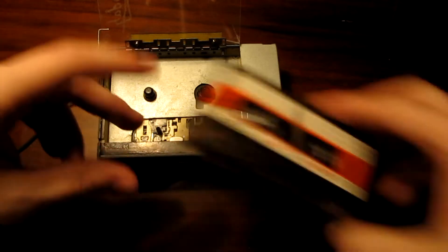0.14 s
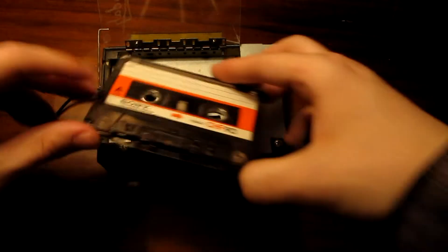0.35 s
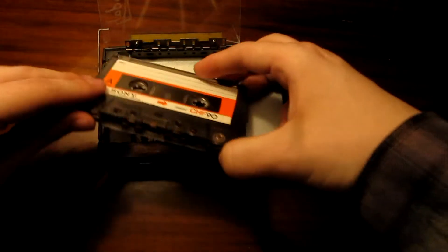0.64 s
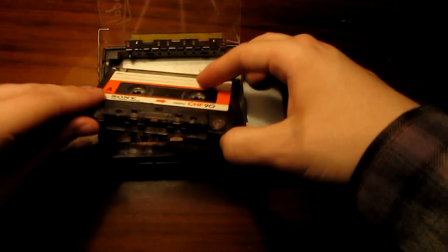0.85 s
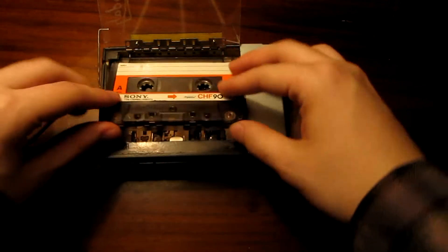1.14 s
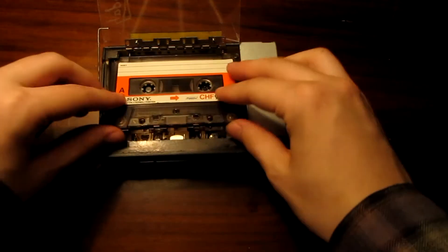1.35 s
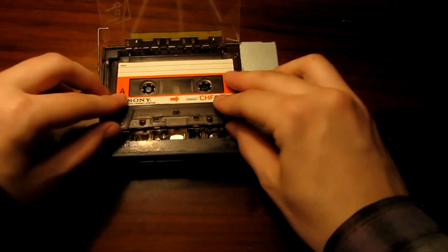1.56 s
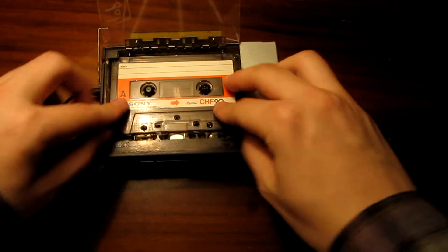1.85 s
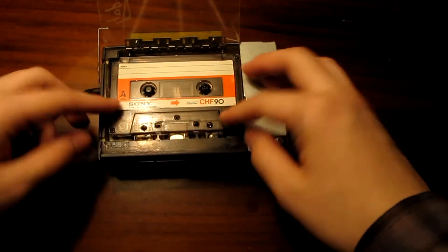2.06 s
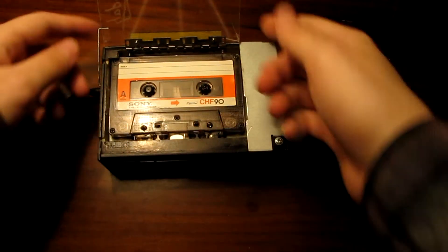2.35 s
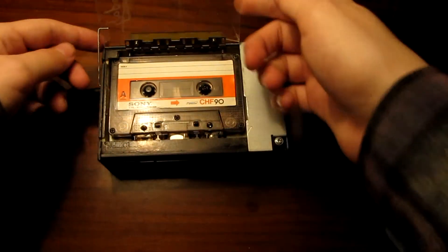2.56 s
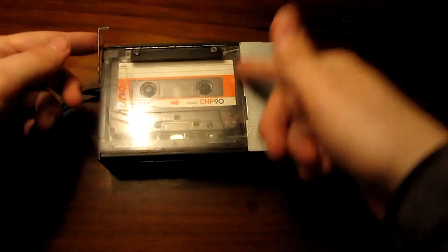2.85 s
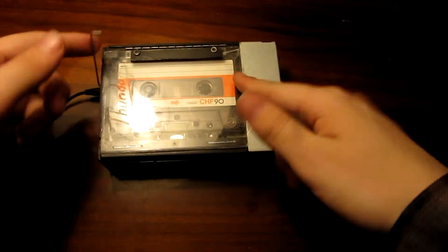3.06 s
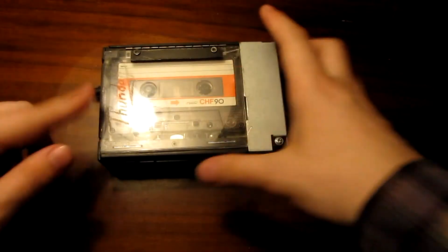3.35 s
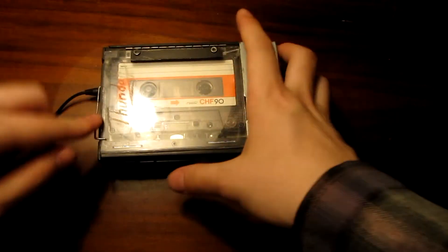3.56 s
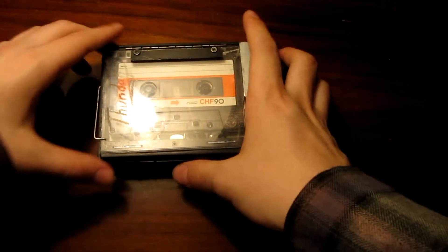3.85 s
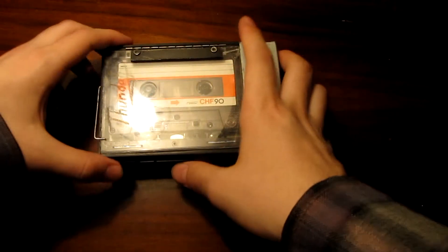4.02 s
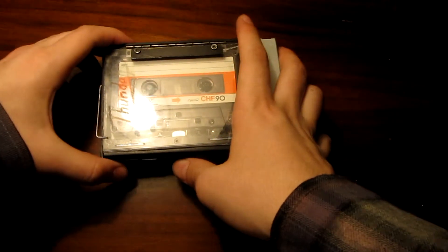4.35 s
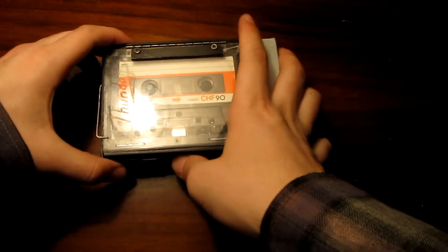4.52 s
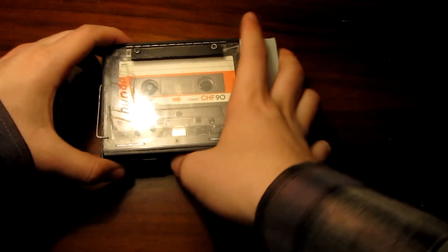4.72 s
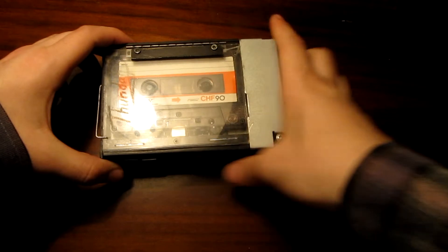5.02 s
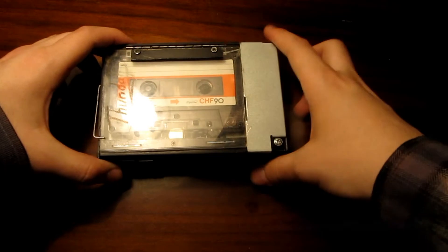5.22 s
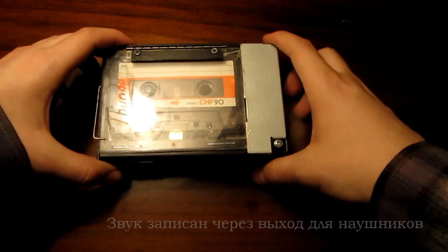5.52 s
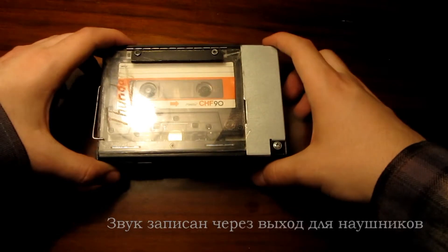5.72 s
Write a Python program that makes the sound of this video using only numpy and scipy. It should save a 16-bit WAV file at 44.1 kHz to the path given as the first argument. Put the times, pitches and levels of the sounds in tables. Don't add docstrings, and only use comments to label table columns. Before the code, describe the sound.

Dry, bright plastic handling sounds: an opening clack, a loose run of rattling taps, a hard double click, a pause with faint finger rubbing, a strong lid snap and a few light button clicks. Soft desk thuds and quiet room noise lie beneath. At the end the sound switches to the player's own output, a dull thump and steady faint hum with hiss.

```python
import sys
import numpy as np
from scipy import signal
from scipy.fft import rfft, irfft
from scipy.io import wavfile
from scipy.ndimage import uniform_filter1d

SR = 44100
rng = np.random.default_rng(int(sys.argv[2]) if len(sys.argv) > 2 else 0)


def boost_factor(decibels):
    exponent = np.asarray(decibels, float) / 20
    return 10 ** exponent


def to_wav(s):
    ch = np.atleast_2d(s).T
    pcm = np.round(np.clip(ch, -1, 1) * 32767)
    wavfile.write(sys.argv[1], SR, pcm.astype(np.int16))


N = 259308
LID_SHUT_S, FADE_S, SWITCH_S = 2.6, 4.345, 4.3715

# start in seconds, peak level in dB,
# body relative to it in dB, brightness relative to it in dB, chatter t60 in seconds.
LID_OPENS = [
    (.0014, -29.5, -14, 11, 0.056),
    (.0054, -12.5, -16, -9, .084),
    (.012, -19, -8.5, -0.5, 0.046),
    (.0171, -18.5, -25, -22, 0.045),
    (0.0232, -25, -11, -7, 0.034),
]
TAPE_LAID = [(0.408, -47, -13, -4, 0.054), (.413, -42, -26, -5, 0.037), (0.4557, -49.5, -4, -5, 0.039),
             (.602, -19.5, -12.5, -17, 0.036), (.6234, -31, -5, -21, 0.064), (0.6512, -25, -18, -18, 0.032),
             (0.6732, -26.5, -12.5, -21, 0.025), (.6856, -34, 0, -15, 0.042),
             (0.6968, -21, -30, -17.5, 0.014), (.734, -19.5, -21, -21.5, 0.014),
             (0.7793, -20, -10.5, -15, 0.042), (0.8953, -21.5, -5, -15, 0.041),
             (.9193, -12, -9.5, -14, 0.035), (1.0324, -27.5, -8, -20.5, 0.011), (1.061, -38, 2, -14, 0.031),
             (1.0644, -31, -3, -25, 0.051), (1.093, -37.5, -3, -20, 0.031), (1.1086, -29, -2, -6.5, 0.026),
             (1.2288, -42, -6, -5, 0.033), (1.298, -26.5, -4.5, -16, .035)]
TAPE_SEATS = [
    (1.4285, -52, 14.5, 8, .11),
    (1.4626, -9, -13, -10, 0.013),
    (1.4669, -9.5, -10.5, 0, 0.011),
    (1.4701, -14, -17, -8, 0.018),
    (1.4837, -32, -14, -5, .032),
    (1.678, -55, -32, -4.5, 0.028),
    (1.8316, -56, -1.5, -2, 0.037),
    (1.845, -56, -9.5, 0.5, .033),
]
LID_SHUTS = [
    (2.6602, -6, -8, 1.5, .013),
    (2.689, -21.5, -6, 0, 0.022),
    (2.711, -32.5, -18, 1, 0.036),
    (2.8075, -36, -10, -1.5, 0.028),
    (2.9247, -65.5, -6.5, -8, .035),
]
KEYS = [(3.2158, -28, -17.5, 1.5, 0.033), (3.2173, -26, -10, -4, 0.035), (3.3994, -62.5, -9.5, -7.5, .035),
        (3.5443, -24.5, -2, -4, 0.039), (3.5545, -28, -3, -5, .03), (3.5634, -33.5, -3, -12, 0.19),
        (3.695, -35.5, -8.5, -20.5, .015), (3.794, -38, -5, -24, 0.025), (4.1829, -64, 5, -1.5, 0.038),
        (4.21, -45, 2.5, -7, .035), (4.2203, -31, -15, -7, 0.012), (4.2238, -32, -15, -15, .012),
        (4.2419, -39.5, -16, -15, .037), (4.2925, -62, -6, -3, .03), (4.3272, -49, -2, 1, 0.065),
        (4.3368, -38, -10, -15, 0.016)]
# seconds, dB, dB, dB, seconds.
FURTHER_CONTACTS = [(2.6582, -34, -10, 0, .02), (1.4503, -40, -5, -15, .03), (1.4548, -30, -8, -12, .03),
                    (1.4885, -36, -15, 0, .02), (3.5475, -29, 0, -6, .02), (3.5505, -29, 0, -8, .02),
                    (0.7055, -36, -10, -15, .012), (0.7425, -34, -10, -18, .015), (0.7545, -35, -10, -15, .015),
                    (0.7655, -38, -10, -15, .015), (0.662, -40, -8, -15, .015), (4.2285, -44, -8, -12, .015),
                    (4.3335, -44, -8, -3, .02), (2.663, -22, -8, 0, .03), (1.4612, -26, -15, 0, .02),
                    (1.0225, -42, -5, -15, .03), (1.0375, -36, -6, -18, .015), (1.058, -40, -3, -15, .02),
                    (1.2945, -42, -5, -15, .03), (1.215, -55, -15, -5, .02), (3.226, -40, -8, 1, .15),
                    (.885, -44, -5, -15, .03)]
# (Hz, level in dB).
STRUCK_PARTS = [
    (0, [(800, 0), (1400, 0), (2400, 0), (4000, 0), (6600, 0), (9000, 0), (13000, -3)]),
    (.3, [(800, 3), (1100, -4), (1700, 1), (2400, 0), (3300, 0), (4500, -2), (7500, 2), (12000, -3)]),
    (1.4, [(800, 2), (1300, -8), (1800, 3), (2400, 2), (2900, -3), (4300, 6), (5600, -4), (7500, 1), (13000, -2)]),
    (2.6, [(800, 0), (1300, -4), (1800, 2), (2900, 0), (4000, 1), (6600, 2), (7600, -5), (11500, 3)]),
    (3.1, [(800, 0), (1500, -6), (2800, 0), (4000, -3), (5000, 2), (7500, 2), (10000, -2), (12000, 5)]),
    (3.5, [(800, 0), (1400, -1), (2000, -2), (2900, 2), (4000, 1), (6600, 0), (12000, 0)]),
    (3.65, [(800, 0), (1400, 0), (2300, -6), (3300, 0), (4500, -4), (8000, 0)]),
    (4.1, [(800, 2), (1400, -5), (2400, 2), (3300, 2), (5000, 0), (8000, 0), (13000, -4)]),
    (4.3, [(800, -5), (1400, 3), (2400, -3), (3300, 0), (5000, 0), (8000, 0), (13000, -4)]),
]
# frequency in Hz, level in dB, t60 in seconds.
BODY_MODES = [(775, -1.5, .01), (1080, -3.5, .012), (1400, -0.5, 0.0087)]
SHELL_MODES = [(1733.6, 0, 0.0035), (2380, 0.018, 0.0051), (2870, 1, 0.0068), (3300, 0.78, 0.0034)]
UPPER_MODES = [(3930, 2, 0.0045), (4700, 0.39, .004), (5000, -1.8, 0.0067), (5597, -2, 0.0019)]
TREBLE_MODES = [(6600, 2.5, 0.0024), (7480, 2.5, 0.0036), (8800, 6, 0.0016), (10160, 3.5, 0.0023),
                (11540, -0.5, 0.0024), (13660, -6.5, 0.0038), (15200, -3.5, .0015)]
# frequency in Hz, level in dB, t60 in seconds.
BAY_RING = [(613, -43, .08), (1370, -48, 0.048), (1800, -46, 0.04), (2130, -49, .045), (2860, -47.5, .06),
            (4330, -53, 0.05), (7560, -45, 0.032)]
LID_RING = [(481, -41, 0.063), (1111.3, -48.5, 0.14), (1340, -47.5, 0.081), (1480, -49.5, 0.066),
            (2430, -53, 0.14), (2900, -50, .07), (3650, -49.5, 0.071), (4900, -49, 0.066)]
# start in seconds, frequency in Hz, level in dB, t60 in seconds.
PINGS = [(2.6604, 2280, -15, .03), (2.6603, 1110, -21, .06), (2.6603, 1350, -29, .06),
         (2.668, 9250, -35, .05), (2.69, 9200, -30, .02), (2.69, 2800, -40, .15), (3.217, 490, -48, .12),
         (3.217, 1100, -50, .1), (3.218, 2860, -36, .06), (4.2205, 3000, -36, .015),
         (4.224, 2600, -41, .02), (4.3365, 1500, -42, .02), (4.337, 3250, -44, .02),
         (1.299, 2900, -36, .025), (1.299, 1800, -38, .03), (.897, 1800, -34, .02),
         (1.037, 1800, -36, .015), (3.56, 750, -44, .12), (1.489, 7500, -34, .012),
         (2.6604, 3950, -15, .015), (2.6606, 6240, -17, .012), (2.6606, 9210, -13, .014),
         (2.6606, 11100, -19, .012), (2.692, 2370, -45, .2), (2.692, 1500, -48, .25),
         (2.692, 1110, -48, .2), (2.808, 1110, -48, .06), (2.808, 4850, -48, .03), (1.467, 4330, -10, .014),
         (1.467, 1790, -17, .025), (1.4675, 7540, -19, .025), (1.4675, 6600, -22, .02),
         (3.2165, 12000, -34, .015), (3.2162, 7400, -38, .03), (3.2175, 5090, -38, .025),
         (3.546, 1420, -39, .05), (3.5625, 1300, -42, .05), (3.5735, 3950, -46, .02), (3.552, 280, -35, .1),
         (4.327, 1250, -50, .04), (4.21, 950, -52, .03), (4.219, 300, -52, .08), (.919, 2130, -26, .03),
         (.92, 7900, -34, .012), (.78, 1850, -32, .03), (.652, 4100, -36, .012), (.825, 1800, -50, .08)]
# start in seconds, peak level in dB, share of the hollow ring in dB.
KNOCKS = [(0.009, -41.5, -15.5), (0.6, -35.5, -18), (0.648, -49.5, 3), (0.699, -43.5, 3), (0.728, -52, -6),
          (0.78, -37, -15.5), (0.901, -43.5, -1), (0.918, -36.5, -4.5), (1.0225, -35, -3),
          (1.058, -40.5, -6), (1.108, -44.5, -4), (1.297, -41.5, -11.5), (1.43, -41.5, -1.5),
          (1.466, -30, -4.5), (1.834, -51, -5), (2.66, -27.5, -13), (2.689, -59, -7), (3.219, -49, -6.5),
          (3.55, -33, -5), (3.566, -44.5, -1.5), (4.218, -45, -2), (4.238, -52.5, -2.5), (4.335, -59, -3)]
# frequency in Hz, level in dB, t60 in seconds.
DESK_MODES = [(55, -14.5, 0.061), (133, -7, 0.043), (208.4, -6, .06), (231, -4.5, 0.074),
              (316.7, 0.5, 0.029), (413, -4, 0.026), (500, -7, 0.022)]
# centre in seconds, length in seconds, frequency in Hz,
# half width as a share of the frequency, level in dB.
SCUFFS = [(0.516, .04, 4000, 0.16, -62), (0.75, 0.02, 2400, 0.35, -52), (0.839, 0.021, 2390, 0.53, -51.5),
          (0.963, 0.021, 2060, 0.64, -48), (1.435, 0.0097, 2760, 0.71, -46),
          (1.458, 0.0042, 2800, 0.94, -33.5), (1.76, 0.016, 4080, 0.16, -66.5),
          (1.912, 0.034, 3120, 0.11, -66.5), (1.935, .012, 3100, 0.19, -53),
          (1.936, 0.013, 1400, 0.17, -57.5), (1.954, 0.022, 886, 0.051, -61),
          (1.94, .008, 8800, 0.05, -62.5), (3.87, 0.019, 3000, 0.18, -71.5),
          (3.221, 0.002, 4900, 0.15, -48), (3.562, 0.008, 1400, 0.15, -47),
          (3.586, 0.028, 520, 0.71, -55.5), (1.305, 0.0067, 550, 0.52, -42.5),
          (4.246, 0.026, 2900, 0.2, -64.5), (4.335, 0.0031, 1450, 0.1, -56), (0.83, 0.031, 8140, 0.22, -56),
          (3.275, 0.03, 2850, 0.15, -62), (4.224, 0.004, 2980, 0.2, -50)]
# centre in seconds, length in seconds, swell in dB.
STROKES = [
    (0, .06, 26.5),
    (0.808, .06, 15),
    (1.06, .07, 8),
    (2.268, .3, 2),
    (2.74, .04, 17.5),
    (3.78, .1, 3),
]
# multiple of the base pitch, relative level in dB.
MAINS = [(1, -1.5), (2, -22), (3, -35), (6, -39.5), (9, -49.5), (10, -40)]
MOTOR = [(1, -35), (2, -34.5), (3, -40.5), (4, -42), (5, -43.5), (6, -46), (7, -48), (8, -46), (14, -48)]
# frequency in Hz, level in dB per Hz.
HISS = [(76, -35), (130, -6), (283, -8.5), (371, -12), (547, -11.5), (592, -16.5), (823, -11.5), (943, -15),
        (2350, -18), (13500, -6)]
# centre in seconds, length in seconds, frequency in Hz, dB over the hiss.
BRUSH = [
    (4.419, 0.039, 8490, -10),
    (4.86, 0.038, 8220, -8.5),
    (4.896, .012, 9600, -2.5),
    (5.002, 0.029, 8800, -7.5),
    (5.497, .03, 8500, -10),
    (5.778, 0.033, 8700, -4),
]
# low edge in Hz, high edge in Hz, desk t60 in seconds,
# desk level in dB, room t60 in seconds, room level in dB.
TAILS = [(150, 400, 0.083, -11, 0.44, -15.5), (400, 1200, .1, -12, 0.24, -20.5),
         (845, 1800, .08, -13, 0.49, -18.5), (1840, 3500, 0.04, -15, 0.45, -19),
         (3560, 5700, .07, -16, 0.44, -21), (6550, 11000, 0.048, -13, 0.32, -20),
         (11000, 22000, 0.041, -15.5, .2, -22.5)]
# frequency in Hz, relative level in dB.
WHISTLE = [(7822, -14), (7854, -9), (7881, 0), (7940, -15), (10083, -13)]
# frequency in Hz, level in dB per Hz.
RUMBLE = [(12, -33.5), (20, -5.5), (32, 0), (43, 4), (57, -0.5), (75, -6), (160, -11.5), (210, -41),
          (350, -120)]
AIR = [(71, -33.5), (120, -3.5), (200, 2), (326, -4), (978, -8.5), (1980, -17), (5820, -24), (7360, -23),
       (7810, -19), (8450, -23), (10300, -22.5), (13000, -35.5)]
# time in seconds, gain in dB.
GAIN = [(0, 0.5), (.36, -1), (.93, 4), (1.1, 1), (1.44, 0), (1.63, -11), (2.02, -4.5), (2.6, -1.5),
        (2.68, 0.5), (2.78, -14.5), (2.97, -15.5), (3.4, -6), (3.72, -4), (4.03, -4), (4.14, -8.5),
        (4.26, -10.5), (4.36, -21.5)]
# low edge in Hz, high edge in Hz, threshold in dB.
TOP_BANDS = [(12400, 13000, -109), (13000, 13700, -106), (13700, 14400, -92), (14400, 15100, -85),
             (15100, 15800, -79), (15800, 16600, -70)]


def rms_one(x):
    return x / np.sqrt(np.mean(x ** 2) + 1e-20)


def band(x, low_hz, high_hz):
    return signal.sosfilt(signal.butter(2, [low_hz, high_hz], "band", fs=SR, output="sos"), x)


def coloured(spectrum):
    hz, db = np.transpose(spectrum)
    grid = np.maximum(np.fft.rfftfreq(N, 1 / SR), 1)
    shape = boost_factor(np.interp(np.log(grid), np.log(hz), db, left=-90))
    return rms_one(irfft(rfft(rng.standard_normal(N)) * shape, N))


def impulses(at, heights):
    return np.bincount(at, heights, N)


def ring(clicks, hz, t60):
    r, w = boost_factor(-60 / (t60 * SR)), 2 * np.pi * hz / SR
    return signal.lfilter([0, np.sin(w)], [1, -2 * r * np.cos(w), r * r], clicks + 1e-18)


def sines(t, partials, base_hz):
    return sum(boost_factor(db) * np.sqrt(2) * np.sin(2 * np.pi * (k * base_hz * t + rng.random())) for k, db in partials)


def puff(s, length, hz, share):
    swell = np.exp(-.5 * ((np.arange(N) / SR - s) / length) ** 2)
    uneven_db = 1.4 * np.repeat(rng.standard_normal(N // 100 + 1), 100)[:N]
    share = np.clip(share, .02, .8)
    noise = band(rng.standard_normal(N), (1 - share) * hz, (1 + share) * hz)
    return swell * boost_factor(uneven_db) * rms_one(noise)


def chatter(t60):
    size, rise_s, grain_db, crack_db = 4096, 0.0005, 2.0, -4.0
    t = np.arange(size) / SR
    noise, grain = rng.standard_normal((2, len(t60), size))
    dying = (1 - np.exp(-t / rise_s)) * boost_factor(-60 * t / np.clip(t60[:, None], .003, .2))
    force = noise * boost_factor(grain_db * grain) * dying
    force /= np.sqrt(np.sum(force ** 2, axis=1, keepdims=True))
    force[:, 4] += boost_factor(crack_db)
    return force


def favour_db(action, hz):
    favours = []
    for _, curve in STRUCK_PARTS:
        curve_hz, curve_db = np.transpose(curve)
        favours.append(np.interp(np.log(hz), np.log(curve_hz), curve_db))
    return np.array(favours)[action]


def contacts():
    scatter_db = 1.54
    upper_follows = .55
    hits = np.concatenate([LID_OPENS, TAPE_LAID, TAPE_SEATS, LID_SHUTS, KEYS, FURTHER_CONTACTS])
    s, peak_db, body_db, bright_db, t60_s = hits.T
    force = chatter(t60_s)
    at = (s[:, None] * SR).astype(int) + np.arange(force.shape[1])
    action = np.searchsorted([start for start, _ in STRUCK_PARTS], s) - 1
    families = [(BODY_MODES, body_db - 1.5), (SHELL_MODES, -1.5),
                (UPPER_MODES, upper_follows * bright_db - .6), (TREBLE_MODES, bright_db + 1.9)]
    out, sign = np.zeros(N), 1
    for modes, family_db in families:
        part = 0
        for hz, db, t60 in modes:
            random_db = scatter_db * rng.standard_normal(len(s))
            strength = sign * boost_factor(peak_db + family_db + db + favour_db(action, hz) + random_db)
            part += ring(impulses(at.ravel(), (force * strength[:, None]).ravel()), hz, t60)
            sign = -sign
        out += band(part, .75 * modes[0][0], 1.4 * modes[-1][0])
    return out + after_ring(out)


def after_ring(x):
    shut = np.arange(N) / SR > LID_SHUT_S
    out = 0
    for side, modes in [(~shut, BAY_RING), (shut, LID_RING)]:
        for hz, db, t60 in modes:
            out = out + boost_factor(db) * ring(x * side, hz, t60)
    return out


def pings():
    return sum(boost_factor(db) * ring(impulses([int(s * SR)], [1]), hz, t60) for s, hz, db, t60 in PINGS)


def knocks():
    hollow_hz, hollow_t60_s = 255, 0.36
    s, peak_db, hollow_db = np.transpose(KNOCKS)
    at = (s * SR).astype(int)
    out = ring(impulses(at, boost_factor(peak_db + hollow_db - 3.5) * (s < LID_SHUT_S)), hollow_hz, hollow_t60_s)
    for k, (hz, db, t60) in enumerate(DESK_MODES):
        scatter_db = 1.7 * rng.standard_normal(len(s))
        out += ring(impulses(at, (-1) ** k * boost_factor(peak_db + db + scatter_db)), hz, t60)
    return band(out, 45, 900)


def scuffs():
    return sum(boost_factor(db) * puff(*shape) for *shape, db in SCUFFS)


def rubbing(gain_db):
    dull_db, bright_db, bright_follows, gain_share = -68.5, -69.5, .35, .9
    t = np.arange(N) / SR
    stroke_db = sum(db * np.exp(-.5 * ((t - s) / length) ** 2) for s, length, db in STROKES)
    grains = rng.standard_normal((2, N)) * boost_factor(3.2 * np.minimum(rng.exponential(1, N), 4))
    dull = boost_factor(dull_db + stroke_db) * rms_one(band(grains[0], 1100, 4100))
    bright = boost_factor(bright_db + bright_follows * stroke_db) * rms_one(band(grains[1], 4600, 12500))
    return boost_factor(gain_share * gain_db) * (dull + bright)


def player_output():
    mains_hz, motor_hz = 49, 279
    t = np.maximum(np.arange(N) / SR - SWITCH_S, 0)
    hum_db, hiss_db = -61 + 4 * t, -72 + 3.5 * t
    rise = 1 - np.exp(-t / 0.0029)
    thump = boost_factor(-21.0) * rise * (boost_factor(-24.0) * np.exp(-t / 0.63) - np.exp(-t / 0.042))
    whine = boost_factor(-75) * np.exp(-(t / 0.054) ** 2) * np.sin(2 * np.pi * 3920 * t)
    hum = boost_factor(hum_db) * (sines(t, MAINS, mains_hz) + sines(t, MOTOR, motor_hz))
    hiss = coloured(HISS)
    for s, length, hz, db in BRUSH:
        hiss += boost_factor(db) * puff(s, length, hz, 0.11)
    return (t > 0) * (thump + whine + hum + boost_factor(hiss_db) * hiss)


def reverberation(x):
    out, noise = 0, rng.standard_normal((2, N))
    for k, (low_hz, high_hz, *tails) in enumerate(TAILS):
        power, linger = band(x, low_hz, high_hz) ** 2 + 1e-18, 0
        for t60, db in zip(tails[::2], tails[1::2]):
            r = boost_factor(-120 / (t60 * SR))
            linger = linger + boost_factor(2 * db) * signal.lfilter([1 - r], [1, -r], power)
        out = out + np.sqrt(linger) * rms_one(band(noise[k % 2], low_hz, high_hz))
    return np.append(np.zeros(90), out[:-90])


def room(gain_db):
    whistle = boost_factor(-75 + .8 * gain_db) * sines(np.arange(N) / SR, WHISTLE, 1)
    rumble = boost_factor(-58 + gain_db) * coloured(RUMBLE)
    air = boost_factor(-56 + gain_db) * coloured(AIR)
    return whistle + rumble + air


def scene():
    t = np.arange(N) / SR
    hits = contacts() + pings() + knocks() + scuffs()
    gain_s, gain_points_db = np.transpose(GAIN)
    gain_db = np.interp(t, gain_s, gain_points_db)
    heard = hits + reverberation(hits) + rubbing(gain_db) + room(gain_db)
    heard = signal.sosfilt(signal.butter(4, 13200, fs=SR, output="sos"), heard)
    fade = np.clip((SWITCH_S - t) / (SWITCH_S - FADE_S), 0, 1) ** 1.9
    return (heard * fade + player_output())[None]


def low_pass(x):
    return signal.sosfilt(signal.butter(12, 16590, fs=SR, output="sos"), x)


def record(dry):
    rounded = np.tanh(dry)
    hz, _, frames = signal.stft(rounded[0], SR, nperseg=512)
    frames[hz > TOP_BANDS[-1][1]] = 0
    for low_hz, high_hz, db in TOP_BANDS:
        rows = (hz > low_hz) & (hz <= high_hz)
        power = uniform_filter1d(np.mean(np.abs(frames[rows]) ** 2, axis=0), size=3)
        frames[rows] *= power > boost_factor(2 * db)
    mix = signal.istft(frames, SR)[1][None, :N]
    return low_pass(mix)


dry = scene()
out = record(dry)
to_wav(out)
```